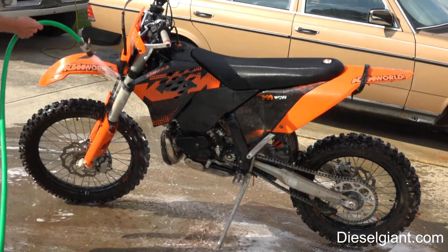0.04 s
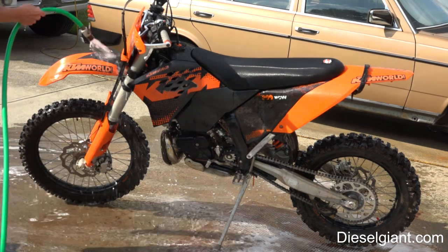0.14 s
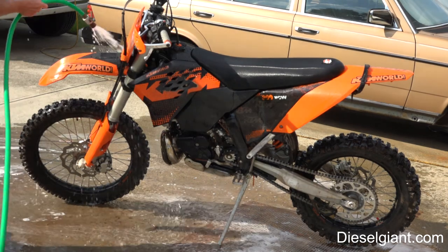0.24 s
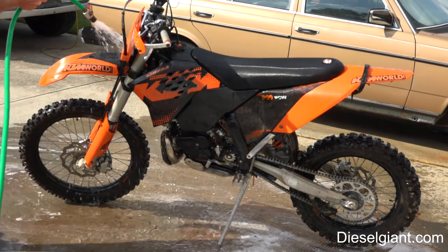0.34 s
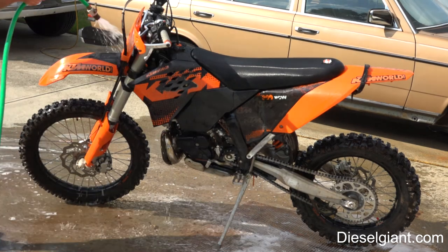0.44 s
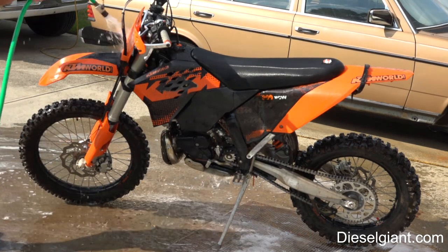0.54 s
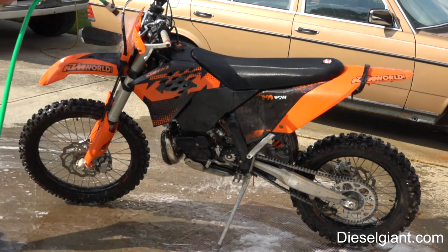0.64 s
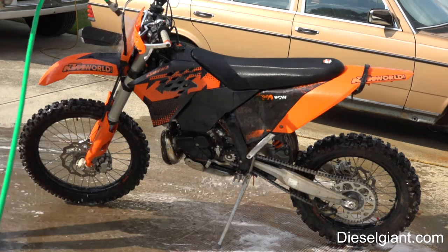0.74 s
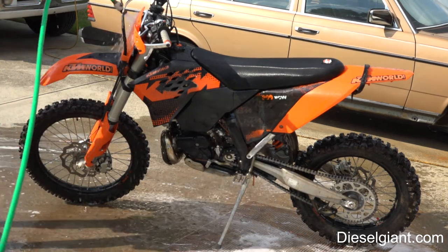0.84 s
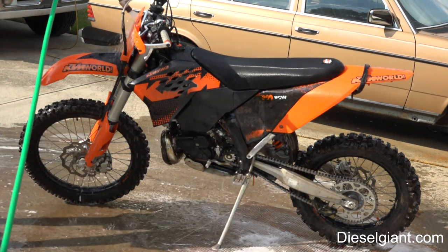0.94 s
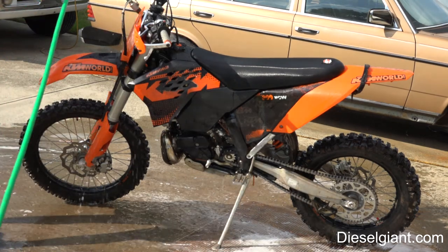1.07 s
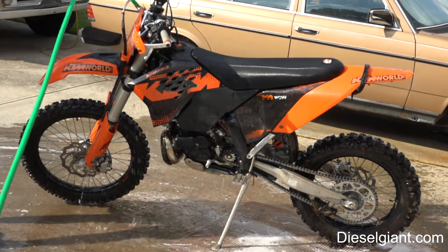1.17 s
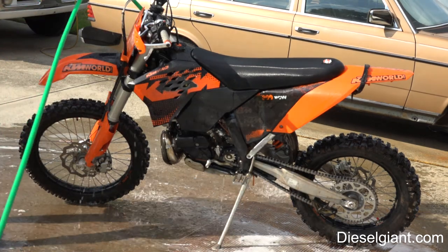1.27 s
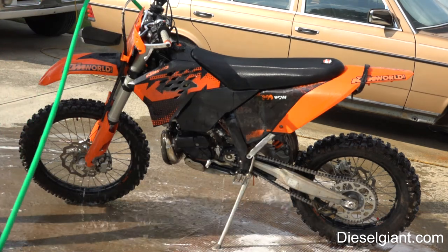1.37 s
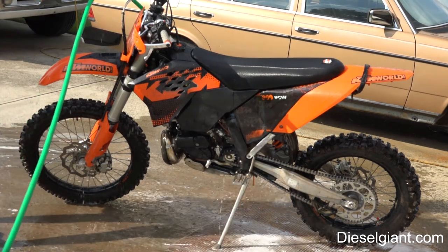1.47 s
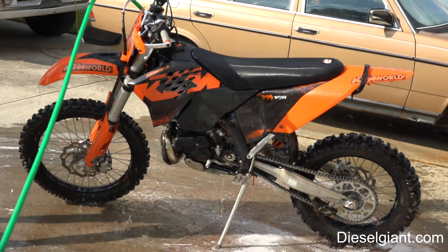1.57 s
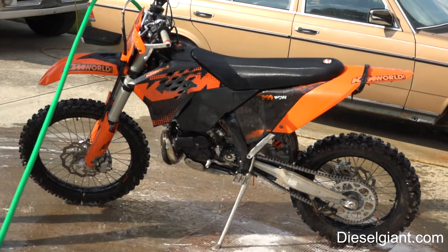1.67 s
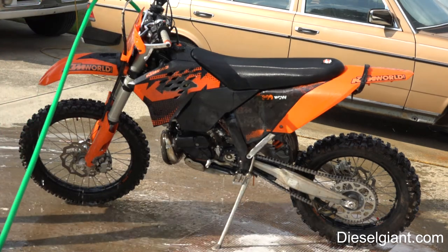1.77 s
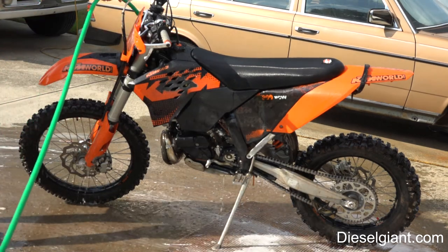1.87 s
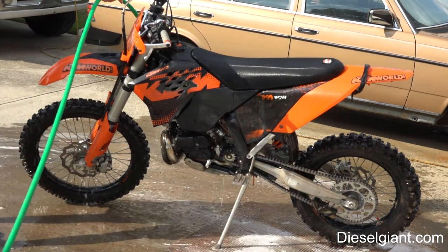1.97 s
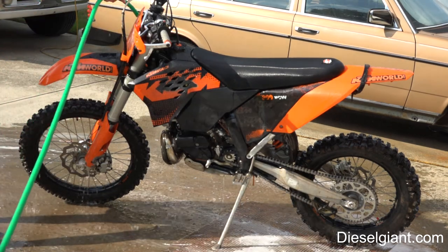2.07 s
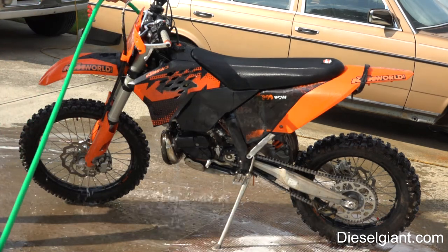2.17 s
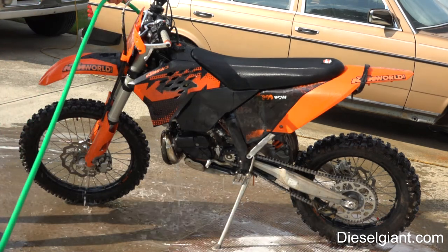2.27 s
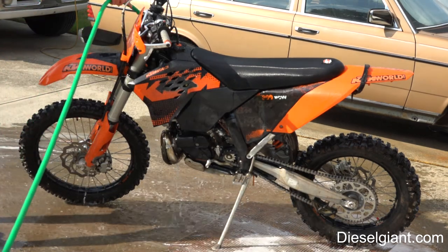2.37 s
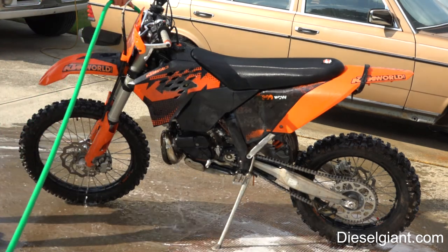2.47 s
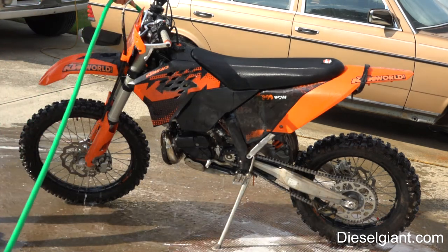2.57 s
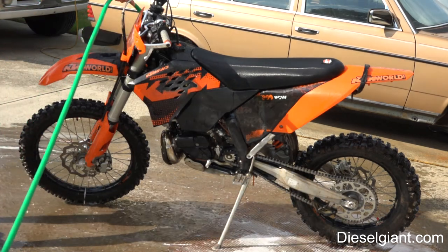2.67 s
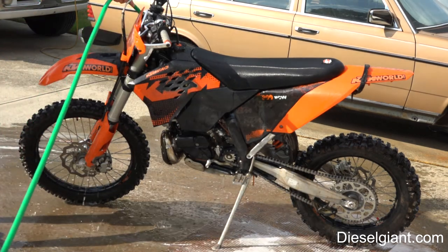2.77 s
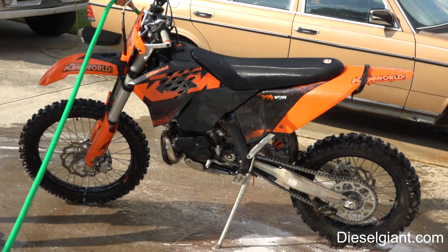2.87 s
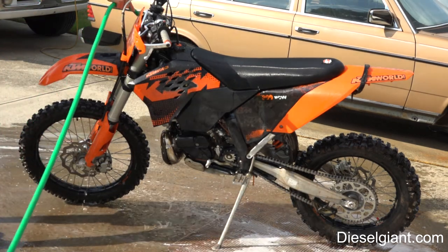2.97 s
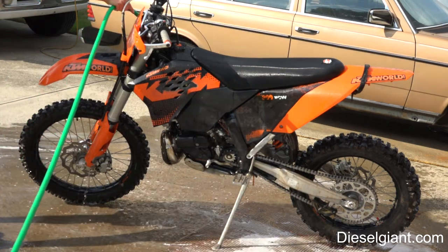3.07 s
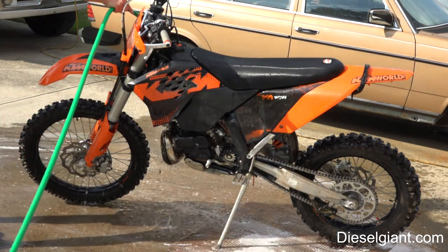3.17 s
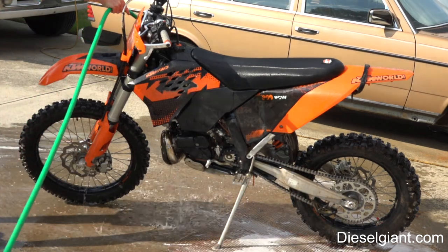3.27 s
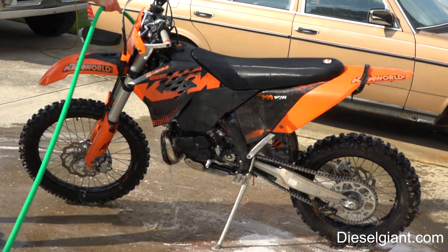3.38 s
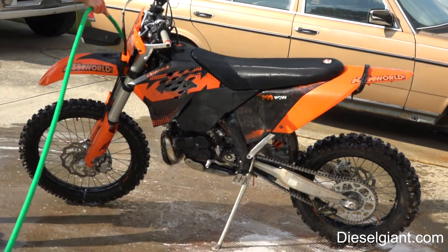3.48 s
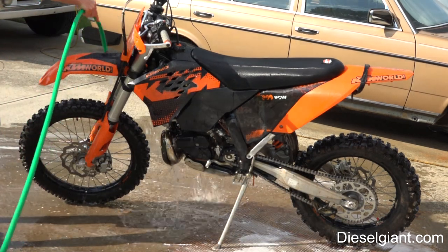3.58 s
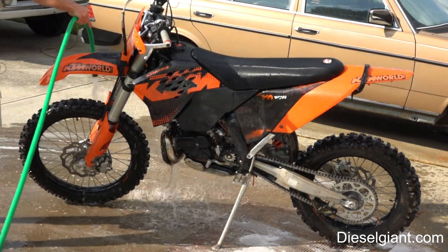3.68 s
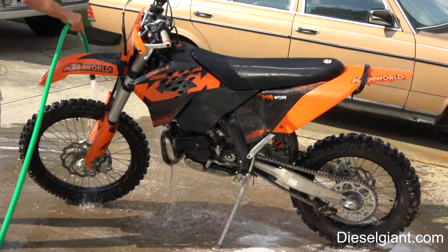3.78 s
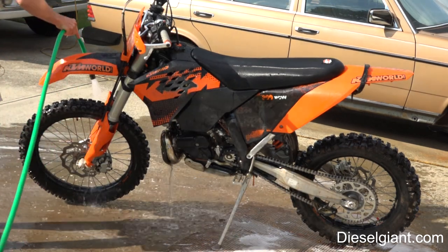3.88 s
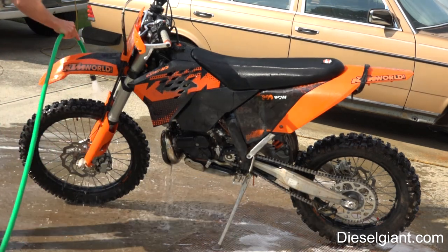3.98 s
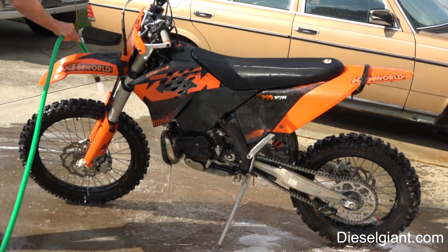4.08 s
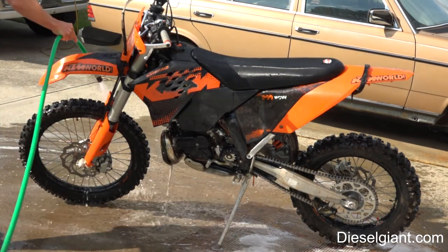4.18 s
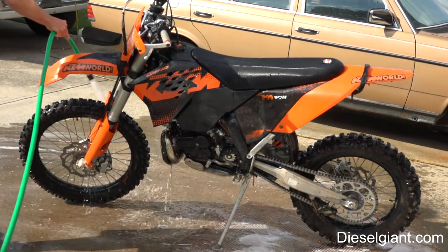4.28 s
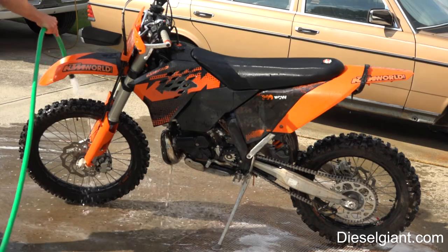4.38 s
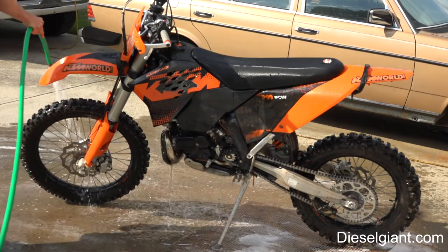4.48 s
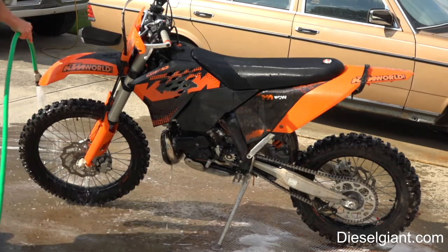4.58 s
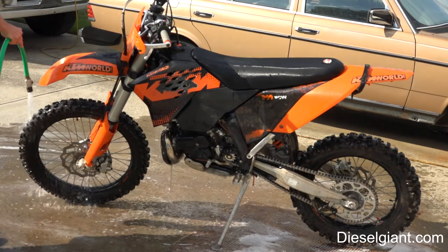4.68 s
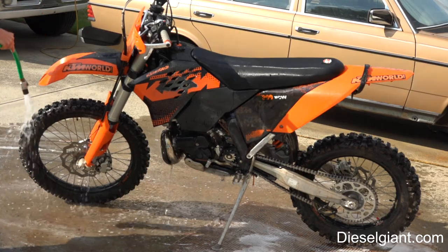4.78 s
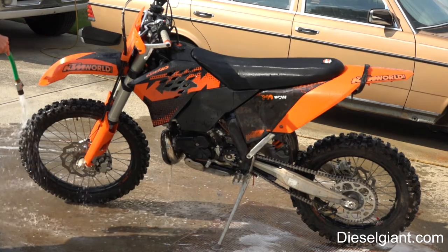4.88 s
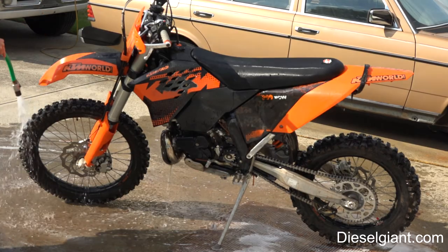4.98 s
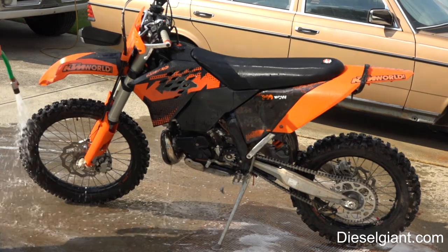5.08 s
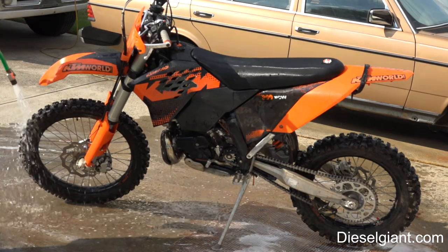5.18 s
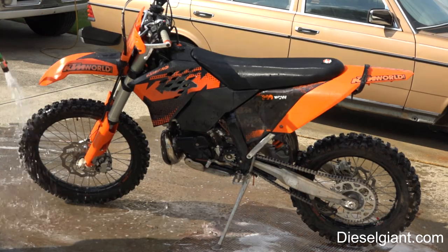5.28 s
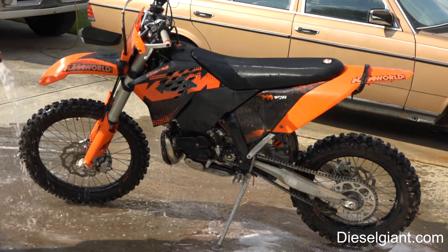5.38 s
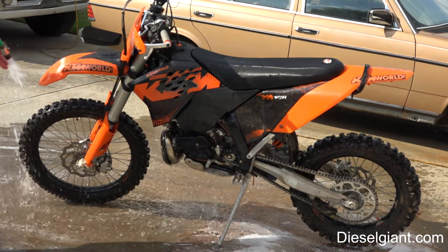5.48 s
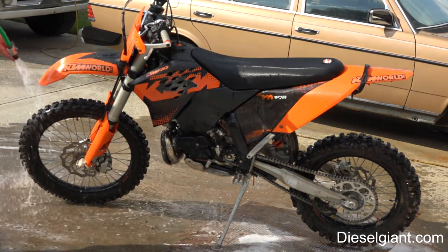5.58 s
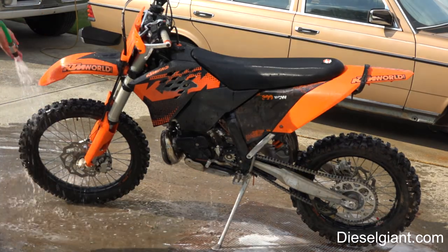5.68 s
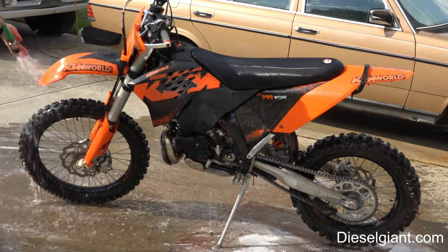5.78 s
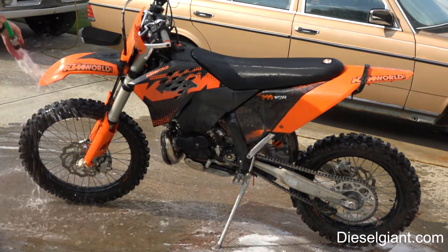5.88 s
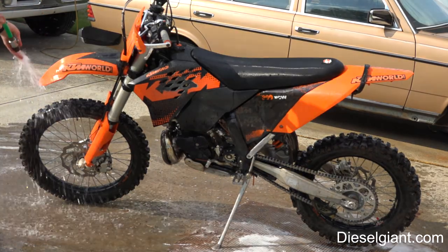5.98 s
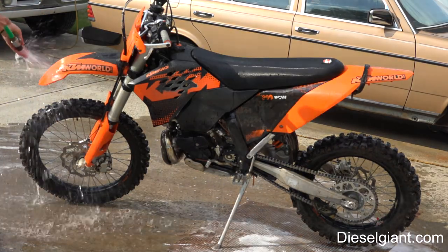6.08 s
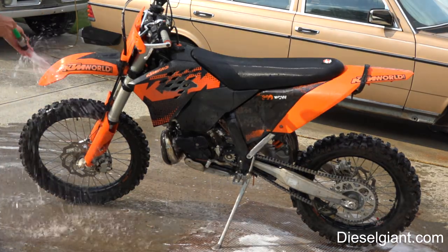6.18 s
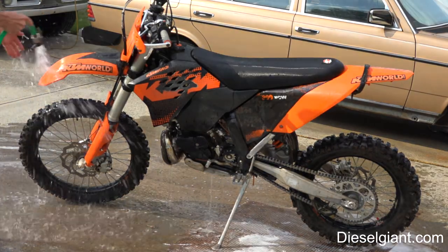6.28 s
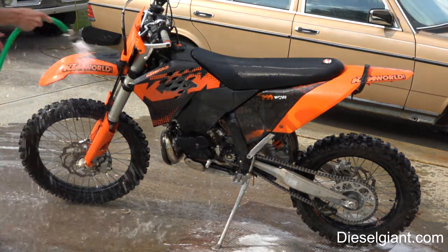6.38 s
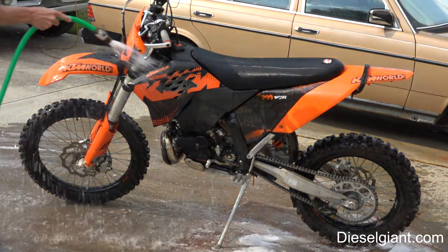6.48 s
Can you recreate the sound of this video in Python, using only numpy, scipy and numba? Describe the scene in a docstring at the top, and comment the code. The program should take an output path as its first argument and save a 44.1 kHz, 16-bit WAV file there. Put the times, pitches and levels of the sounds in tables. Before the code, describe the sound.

A hose jet hisses and crackles over a motorbike outdoors, spattering hard parts, briefly drumming on plastic, then sweeping the front tyre with sinking tones.

```python
"""A hissing, crackling jet from a garden hose is heard first, striking a muddy motorbike outdoors.
Random impacts and resonant bubbles, shaped by filters, make its splash, spray, slosh and mist.
Run-off patters on concrete and filtered noise rumbles as wind on the microphone; fat drops smack, hollows ring,
and a well-damped plastic panel drums briefly. A faint motor, a sum of harmonics, then hums far away;
late on the jet sweeps the front tyre, where two resonances sink in pitch."""
import sys
import numpy as np
from scipy import signal
from scipy.fft import rfft, irfft
from scipy.io import wavfile
from scipy.ndimage import uniform_filter1d, map_coordinates
from numba import njit

SR = 44100
rng = np.random.default_rng(int(sys.argv[2]) if len(sys.argv) > 2 else 0)


def transcribe(signal):
    """Save signal, clipped to [-1, 1], as a 16-bit WAV file at the path in sys.argv[1]."""
    frames = np.atleast_2d(signal).T
    limited = np.clip(frames, -1, 1)
    pcm = np.round(limited * 32767).astype(np.int16)
    wavfile.write(sys.argv[1], SR, pcm)


N = 288414  # length in samples

# Spectra of the jet's four layers. Each row: frequency in Hz, relative level in dB.
SPLASH_SPECTRUM = [(1200, -31), (2200, -18), (2900, -0.5), (3500, 0), (4200, 0.5), (4900, -3.5),
                   (5800, -11), (7500, -36), (12000, -45)]
SPRAY_SPECTRUM = [(3000, -30), (4800, -1.5), (5700, 1), (7000, -2), (8500, -5.5), (10000, -11.5),
                  (11500, -17.5), (13500, -22.5), (15700, -39.5)]
SLOSH_SPECTRUM = [(400, -35), (800, -5), (1100, -4), (1500, -2), (1800, 1), (2150, 3.5), (2700, 3),
                  (3500, -2.5), (6000, -54)]
MIST_SPECTRUM = [(3000, -19.5), (9000, -4), (15700, -15.5)]

# The jet dwells on one part of the bike after another, each until the next begins.
# Each row: start in seconds, splash level in dB, fine spray level in dB before a fixed lift.
JET_AIMS = [(0, -22, -31), (.27, -22, -37), (.61, -20, -30.5), (1.03, -25.5, -41), (1.28, -25.5, -31.5),
            (1.52, -28.7, -37.7), (1.88, -27.5, -36), (2.15, -27, -34), (2.48, -29.5, -39),
            (2.97, -27, -36.5), (3.48, -27, -40.5), (3.64, -24, -31), (3.8, -25, -38), (4.07, -25.3, -34.5),
            (4.34, -27.3, -37), (4.59, -25, -35), (5.33, -26, -37.5), (5.72, -23.5, -34.5),
            (6.14, -21, -31.5)]
SHIFT_S = 0.074  # time the jet takes to cross from one part to the next

# Surges: the jet catches an edge and throws a heavy splash. Each row: centre in seconds, extra level in dB.
JET_SURGES = [(.97, 1.5), (2.44, 2), (3.6, 4.5), (6.27, 2.5)]
SURGE_S, SURGE_SLOSH = 0.038, 0.7  # rise and fall time; further dB of slosh per dB of surge

# Heavy water: level in dB under a 0 dB splash, before a fixed lift, and dB gained per dB of splash.
SLOSH_DB, SLOSH_SHARE = -23.5, 0.52

# Echo off the wetted surface beside the impact, which recedes as the jet moves forward.
# Each row: time in seconds, spacing of its notches in Hz, strength from 0 to 1.
WET_SURFACE_ECHO = [(.1, 2400, .15), (.75, 3020, 0.31), (1.4, 2500, .16), (2.1, 3000, 0.14),
                    (2.68, 3220, 0.4), (3.3, 2930, .16), (3.83, 2580, 0.13), (4.7, 2220, 0.14),
                    (5.6, 2064, 0.24), (6.3, 2060, 0.2)]

# Bounce of the water sounds off the concrete. Each row: time in seconds, delay in seconds.
GROUND_BOUNCE = [(0, 0.0039), (3.8, 0.0045), (4.8, .00372), (5.1, .00372), (6.2, 0.0046)]

# Run-off on the ground. Each row: time in seconds, level in dB, mean pitch of the puddles in Hz.
RUNOFF_COURSE = [(0, -38, 640), (1.3, -39, 570), (2.5, -36.5, 640), (3.3, -37, 670), (3.75, -39.5, 526),
                 (6.28, -39, 565), (6.42, -32, 734)]

# Spectrum of the run-off's patter. Each row: frequency in Hz, relative level in dB.
PATTER_SPECTRUM = [(100, -15), (200, -12), (350, -4.5), (600, 0), (800, -0.5), (1000, -6.5), (1500, -9),
                   (3000, -35)]

# Spectrum of the wind on the microphone. Each row: frequency in Hz, relative level in dB.
WIND_SPECTRUM = [(20, -32), (35, -11), (50, -7), (85, 0.5), (130, -1.5), (200, -2.5), (320, -6.5),
                 (700, -43)]

# Gusts on the microphone. Each row: peak time in seconds, peak level in dB, rise and fall time in seconds.
WIND_GUSTS = [(.11, -41.5, .05), (1.04, -32, 0.067), (1.17, -42, 0.077), (3.08, -40.5, .05),
              (4.48, -47.5, 0.19), (5.66, -47, .1)]
BREEZE_DB = -53  # the rumble between gusts

# Single fat drops that smack on hard parts.
# Each row: start in seconds, peak in dB before the water film dulls it, initial ring in Hz.
HARD_SMACKS = [(.235, -4, 3820), (.299, -3, 3590), (.687, -8, 4700), (.697, 0.5, 4000), (.739, -4.5, 4340),
               (.865, -5, 4430), (1.316, -6.5, 5440), (1.347, -4, 4130), (1.382, -11, 4660),
               (1.4425, -9, 3760), (1.447, -7, 4500), (2.029, -16, 5500), (2.228, -10.5, 3960),
               (2.7645, -6.5, 3700), (2.774, -5.5, 4270), (3.67, -10, 6000), (3.763, -7, 5500),
               (3.773, -8, 4100), (4.087, -9, 4500), (4.331, -13, 7000), (5.561, -4.5, 3170)]

# Hollow plops. Each row: start in seconds, peak in dB before the water film dulls it, initial ring in Hz.
HOLLOW_PLOPS = [(1.4295, -14.5, 1260), (1.4335, -22, 1330), (1.434, -20, 780), (1.4355, -26.5, 450),
                (2.584, -14.5, 1470), (2.765, -23, 1530)]

# Hollows that ring while the jet plays into them.
# Each row: start in seconds, end in seconds, pitch at start in Hz, pitch at end in Hz, level in dB.
RINGING_HOLLOWS = [(0.248, .36, 3640, 3300, -20), (0.287, 0.365, 2040, 2030, -29.5),
                   (0.39, .592, 4100, 4340, -24.5), (0.605, 1.013, 8900, 8700, -35.5),
                   (0.733, 0.96, 2530, 2560, -26), (0.826, 1.014, 4370, 3570, -19.5),
                   (1.53, 1.934, 2790, 2760, -31.5), (2.324, 3.276, 2740, 2770, -34.5),
                   (2.39, 2.86, 1570, 1520, -33.8), (3.2, 4.245, 4300, 4350, -33),
                   (3.423, 3.653, 2396, 1750, -35.5), (3.657, 3.79, 6200, 6100, -32),
                   (3.757, 4.302, 1920, 2250, -37.5), (3.8, 4.303, 2958, 2765, -34.5),
                   (4.585, 5.3, 9500, 8400, -41.5), (6.22, 6.485, 2980, 3040, -26.5)]
HOLLOW_WIDTH = 0.115  # width of each of two resonator passes, as a share of the first pitch

# Modes of the plastic panel. Each row: frequency in Hz, width of the first pass in Hz, relative level in dB.
PANEL_MODES = [(327, 133, -2), (536, 220, -0.5), (695, 190, 3), (1440, 530, 0.5)]
DRUM_START_S, DRUM_END_S, DRUM_DB = 0.59, 1.01, -23  # level before the sag
DRUM_ATTACK_S, DRUM_SAG_DB_PER_S, DRUM_RELEASE_S = 0.049, 15.5, 0.14

# A faint motor far away slows under load and recovers. Each row: time in seconds, mean firing rate in Hz.
MOTOR_RATE = [(2.1, 86.3), (3, 83.66), (4.1, 82.5), (4.6, 83.9), (5.2, 85.75), (5.9, 86.4)]
MOTOR_START_S = 1.34  # middle of the fade-in
DRONE_DB, DRONE_DB_PER_HZ = -57, 4.5  # level at full speed; fall as the motor slows
OVERTONES_DB, OVERTONES_DB_PER_HZ = -51, 2.5  # mean level at full load; fall as the motor speeds up

# The jet runs over the front tyre and under the mudguard; the gap rings lower as it opens.
# Each row: time in seconds, main ring in Hz, upper ring in Hz, main ring level in dB.
TYRE_SWEEP = [(4.59, 3460, 5750, -26.5), (5.33, 3040, 5144, -26.5), (5.45, 2920, 4700, -24),
              (5.59, 3000, 4750, -18), (5.67, 2593, 4780, -24), (6.03, 2600, 4800, -25),
              (6.16, 2465, 4780, -19.5), (6.31, 2510, 4800, -21)]
TYRE_WIDTH_HZ, TYRE_UPPER_WIDTH_HZ, TYRE_UPPER_DB = 700, 1050, -27.7  # widths of each resonator pass

CEILING = 0.85  # amplitude the rounded peaks approach
TOP_HZ = 15750  # edge of the final low-pass


def undb(db):
    """Definition of the decibel: level to amplitude gain."""
    return 10 ** (np.asarray(db) / 20)


def unit(x):
    """Power normalisation: scale to rms 1."""
    return x / np.sqrt(np.mean(x ** 2))


def curves(table):
    """Linear interpolation: each column of a time table at every sample."""
    s, *columns = np.transpose(table)
    return [np.interp(np.arange(N) / SR, s, c) for c in columns]


def walk(rate):
    """Slow random modulation: a chance value that changes rate times a second; rms 1."""
    k = max(int(SR / rate), 2)
    steps = np.repeat(rng.standard_normal(N // k + 1), k)
    return unit(uniform_filter1d(steps, k)[:N])


def during(start, end, fade_s):
    """Gating: 1 between two times, with straight fades centred on both."""
    t = np.arange(N) / SR
    return np.clip(np.minimum(t - start, end - t) / fade_s + 0.5, 0, 1)


def delayed(x, delay_s):
    """Propagation delay: a copy that comes a moving delay later."""
    return map_coordinates(x, [np.arange(N) - SR * delay_s], order=3)


def colour(x, points, size=4096):
    """Minimum-phase filtering to a (Hz, dB) spectrum, so that clicks keep their sharp front; rms 1."""
    hz, db = np.transpose(points)
    bins = np.maximum(np.arange(size // 2 + 1) * SR / size, 1)
    response_db = np.interp(np.log(bins), np.log(hz), db)
    cepstrum = irfft(np.log(undb(response_db)))
    # folding the cepstrum forward in time makes the filter causal
    cepstrum[1:size // 2] *= 2
    cepstrum[size // 2 + 1:] = 0
    impulse_response = irfft(np.exp(rfft(cepstrum)))
    return unit(signal.fftconvolve(x, impulse_response)[:N])


@njit
def resonate(x, hz, width):
    """Damped resonance: a state-variable band-pass whose centre may move every sample."""
    y, band, low = np.empty(len(x)), 0., 0.
    for i in range(len(x)):
        g, k = np.tan(np.pi * hz[i] / SR), width / hz[i]
        v = (band + g * (x[i] - low)) / (1 + g * (g + k))
        band, low, y[i] = 2 * v - band, low + 2 * g * v, k * v
    return y


def cavity(x, hz, width):
    """Cavity resonance: two passes in series steepen a peak on a moving pitch; rms 1."""
    once = resonate(x, hz, 1. * width)
    return unit(resonate(once, hz, 1. * width))


def drops(rate, spread_db):
    """Random arrivals: on average rate impacts a second, of random size and sign; rms 1."""
    lands = rng.random(N) < rate / SR
    size = undb(spread_db * np.minimum(rng.standard_normal(N), np.e))  # caps the rare largest drops
    return unit(lands * size * rng.choice([-1, 1], N))


def bubbles(low_hz, high_hz, count, rate, spread_db, cycles, patchy_db):
    """Bubble resonance: pockets of many sizes, struck by their own drops, drift in pitch and level; rms 1."""
    out = 0
    for hz in np.geomspace(low_hz, high_hz, count):
        drifting_hz = hz * (1 + 0.038 * walk(9))
        width = hz / (np.pi * cycles)  # the ring decays by 1/e in this many cycles
        ring = resonate(drops(rate, spread_db), drifting_hz, width)
        out = out + unit(ring) * np.sqrt(hz) * undb(patchy_db * walk(9))
    return unit(out)


def aim():
    """Piecewise-steady excitation: splash and spray levels hold on each part and slide to the next."""
    starts, *levels = np.transpose(JET_AIMS)
    part = np.searchsorted(starts[1:], np.arange(N) / SR)
    return [uniform_filter1d(db[part], max(int(SHIFT_S * SR), 1)) for db in levels]


def surges():
    """Transient excitation: extra level in dB as each surge swells and collapses along a bell curve."""
    t = np.arange(N) / SR
    return sum(db * np.exp(-((t - s) / SURGE_S) ** 2) for s, db in JET_SURGES)


def echo(x):
    """Comb interference: an inverted copy a fraction of a millisecond late cuts sliding notches."""
    spacing_hz, strength = curves(WET_SURFACE_ECHO)
    return (x - strength * delayed(x, 1 / spacing_hz)) / np.sqrt(1 + strength ** 2)


def jet(slugs):
    """Impact and bubble radiation: drops burst and ring, throw spray and mist, and heavy water sloshes."""
    splash_db, spray_db = aim()
    surge_db = surges()
    splash_db = splash_db + surge_db
    slosh_db = SLOSH_DB + SLOSH_SHARE * splash_db + SURGE_SLOSH * surge_db

    impacts = drops(rate=6000, spread_db=2) * slugs
    fizz = bubbles(2402, 6100, count=12, rate=260, spread_db=0.5, cycles=4.5, patchy_db=1.03) * slugs
    gurgle = bubbles(855.3, 3020, count=12, rate=260, spread_db=3.0, cycles=7.9, patchy_db=2.0)
    crackle = drops(rate=2500, spread_db=7.5) * slugs * undb(1.1 * walk(120))

    splash = colour(0.71 * impacts + 1.1 * fizz, SPLASH_SPECTRUM)
    spray = colour(0.5 * impacts + crackle + 0.5 * rng.standard_normal(N), SPRAY_SPECTRUM)
    slosh = colour(0.73 * impacts + gurgle, SLOSH_SPECTRUM)
    mist = colour(rng.standard_normal(N) * slugs + 0.5 * crackle, MIST_SPECTRUM)

    bright = splash * undb(splash_db) + spray * undb(spray_db + 1.8)
    heavy = slosh * undb(slosh_db + 3.5)
    return echo(bright) + heavy + mist * undb(0.56 * spray_db - 28.5)


def runoff():
    """Random impact excitation: falling water patters on concrete and rings puddles of changing pitch."""
    db, hz = curves(RUNOFF_COURSE)
    hz = hz * (1 + 0.064 * walk(25))
    puddles = resonate(resonate(drops(rate=900, spread_db=3), hz, 280.0), hz, 470.0)
    patter = colour(drops(rate=3000, spread_db=3.5), PATTER_SPECTRUM)
    return unit(patter + unit(puddles)) * undb(db + 1.0 * walk(12))


def wind():
    """Turbulence noise: a light breeze rumbles on the microphone; each gust swells and dies away."""
    t = np.arange(N) / SR
    gusts = sum(undb(db) * np.exp(-np.abs(t - s) / length) for s, db, length in WIND_GUSTS)
    return colour(rng.standard_normal(N), WIND_SPECTRUM) * np.hypot(undb(BREEZE_DB), gusts)


def bursts(table, cycles, crack, crack_s, glide):
    """Impulse response: each fat drop cracks and leaves a short decaying ring that rises in pitch."""
    out, t = np.zeros(N), np.arange(SR // 20) / SR
    for s, db, hz in table:
        ring = np.sin(2 * np.pi * hz * t * (1 + glide * t)) * np.exp(-t * hz / cycles)
        noise = crack * rng.standard_normal(len(t)) * np.exp(-t / crack_s)
        burst = resonate(ring + noise, np.full(len(t), 1. * hz), 0.85 * hz)
        i = int(s * SR)
        out[i:i + len(t)] += undb(db) * burst / np.abs(burst).max()
    water_film = signal.butter(3, 9500, fs=SR, output="sos")  # dulls the crack
    return signal.sosfilt(water_film, out)


def hollows(slugs, fade_s=0.043):
    """Cavity resonance: air pockets in fork and bodywork ring under drops and glide as the aim shifts."""
    t, out = np.arange(N) / SR, np.zeros(N)
    impacts = drops(rate=3000, spread_db=5.0) * slugs
    for start, end, first_hz, last_hz, db in RINGING_HOLLOWS:
        wet = during(start, end, fade_s)
        on = wet > 0
        hz = np.interp(t[on], [start, end], [first_hz, last_hz])
        out[on] += cavity(impacts[on], hz, HOLLOW_WIDTH * first_hz) * wet[on] * undb(db)
    return out


def drumming():
    """Force envelope: a quick rise, a steady sag in dB, and a dying tail once the jet slides off the panel."""
    t = np.arange(N) / SR
    since = np.maximum(t - DRUM_START_S, 0)
    after = np.maximum(t - DRUM_END_S, 0)
    rise = np.minimum(since / DRUM_ATTACK_S, 1)
    return rise * undb(DRUM_DB - DRUM_SAG_DB_PER_S * since) * np.exp(-after / DRUM_RELEASE_S)


def panel():
    """Modal vibration: water impacts excite the damped modes of a plastic panel like a drum."""
    modes = 0
    for hz, width, db in PANEL_MODES:
        centre = np.full(N, 1. * hz)
        once = resonate(drops(rate=900, spread_db=2.5), centre, 1. * width)
        modes = modes + undb(db) * unit(resonate(once, centre, 2 * width))
    return unit(modes) * drumming()


def motor(fade_s=0.4):
    """Harmonic series of a firing rate: as the motor slows, the drone fades and its overtones grow."""
    hz, = curves(MOTOR_RATE)
    phase = 2 * np.pi * np.cumsum(hz * (1 + 0.0025 * walk(6))) / SR
    drone = np.sin(2 * phase)  # twice the firing rate
    overtones = np.sin(3 * phase) + 0.7 * np.sin(4 * phase) + 1.4 * np.sin(5 * phase)
    drone_db = DRONE_DB - DRONE_DB_PER_HZ * (hz.max() - hz)
    load_db = OVERTONES_DB - OVERTONES_DB_PER_HZ * (hz - hz.min())
    hum = unit(drone) * undb(drone_db) + unit(overtones) * undb(load_db + 4.5 * walk(3.77))
    return hum * during(MOTOR_START_S, np.inf, fade_s)


def tyre(slugs, fade_s=0.03):
    """Cavity resonance: drops on the tread ring the gap under the mudguard at two sinking pitches."""
    main_hz, upper_hz, db = curves(TYRE_SWEEP)
    impacts = drops(rate=3000, spread_db=6.5) * slugs
    main = cavity(impacts, main_hz, TYRE_WIDTH_HZ) * undb(db)
    upper = cavity(impacts, upper_hz, TYRE_UPPER_WIDTH_HZ) * undb(TYRE_UPPER_DB)
    return (main + upper) * during(TYRE_SWEEP[0][0], TYRE_SWEEP[-1][0], fade_s)


def scene():
    """Superposition: sources add, uneven slugs drive jet, hollows and tyre, and the ground reflects water."""
    slugs = undb(0.81 * walk(170) + 1.16 * walk(60))
    smacks = bursts(HARD_SMACKS, cycles=4.7, crack=0.87, crack_s=0.00075, glide=3)
    plops = bursts(HOLLOW_PLOPS, cycles=3.5, crack=1.6, crack_s=0.0062, glide=4.3)
    water = jet(slugs) + smacks + hollows(slugs) + plops + tyre(slugs)
    water = water + 0.19 * delayed(water, curves(GROUND_BOUNCE)[0])
    return (water + runoff() + wind() + panel() + motor())[None]


def record(dry):
    """Soft saturation rounds the tallest peaks; a steep low-pass then cuts the top of the treble."""
    rounded = dry / (1 + (dry / CEILING) ** 6) ** (1 / 6)
    low_pass = signal.ellip(12, 0.1, 80, TOP_HZ, fs=SR, output="sos")
    return signal.sosfilt(low_pass, rounded)


dry = scene()
out = record(dry)
transcribe(out)
```